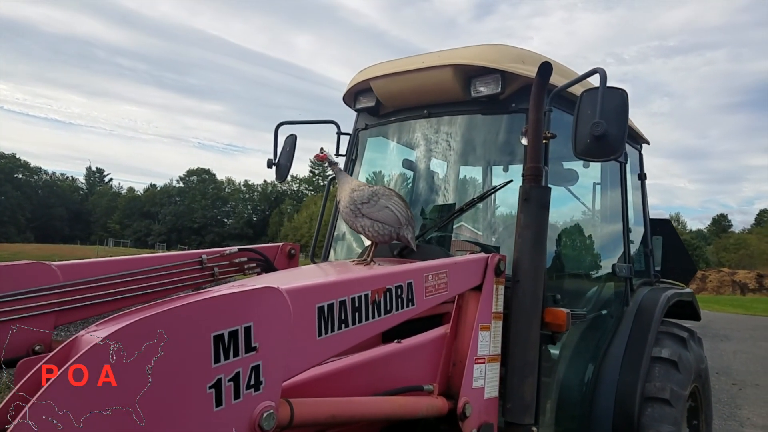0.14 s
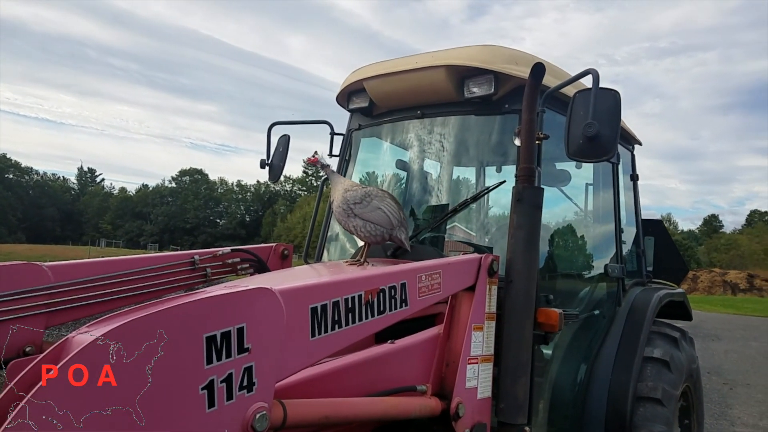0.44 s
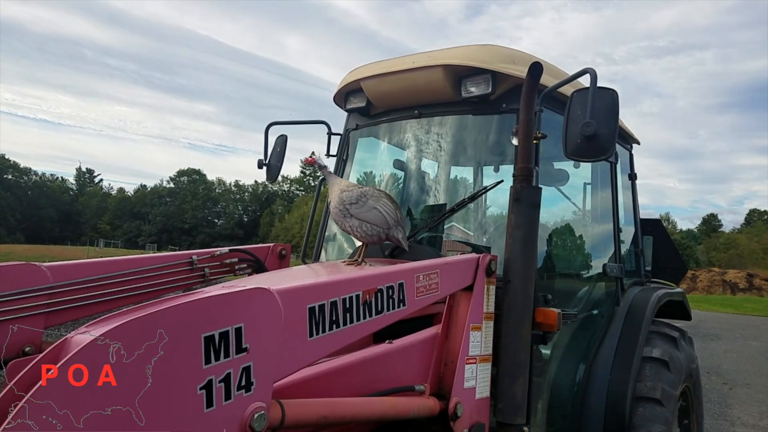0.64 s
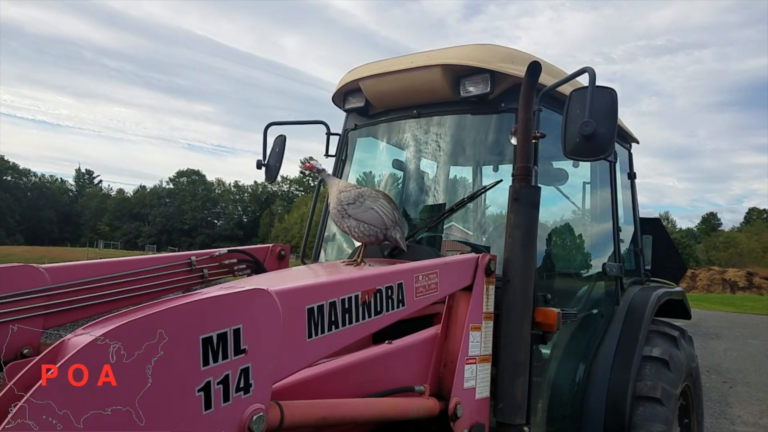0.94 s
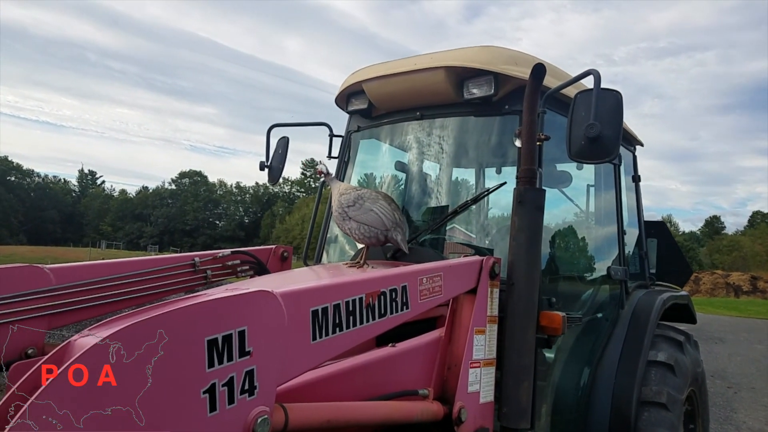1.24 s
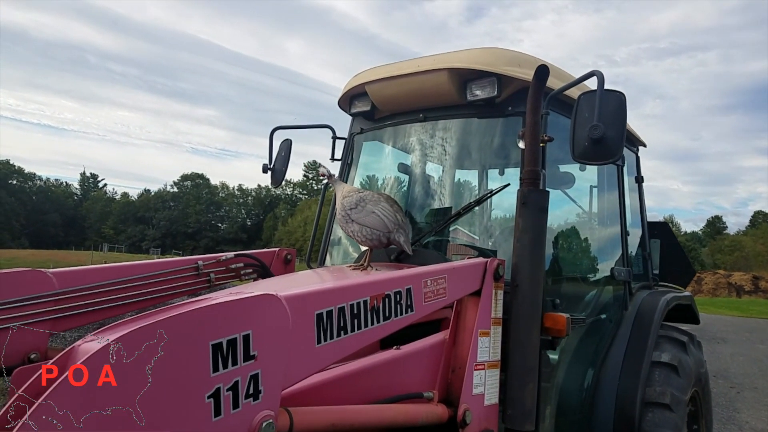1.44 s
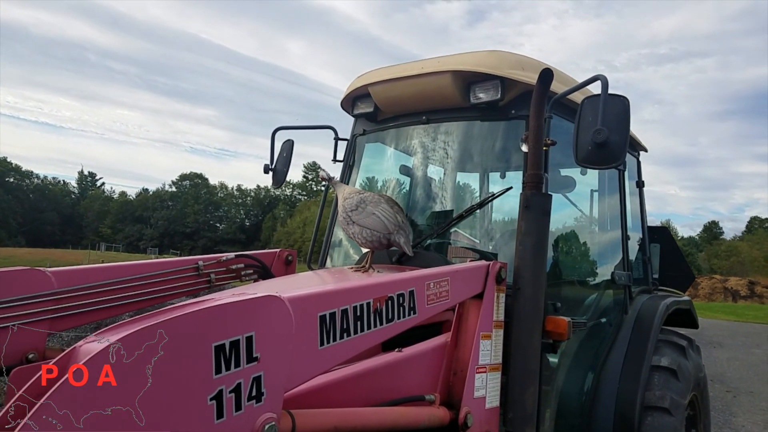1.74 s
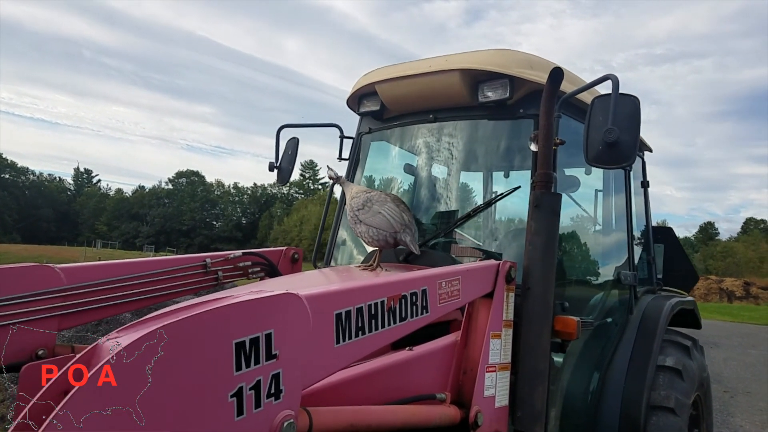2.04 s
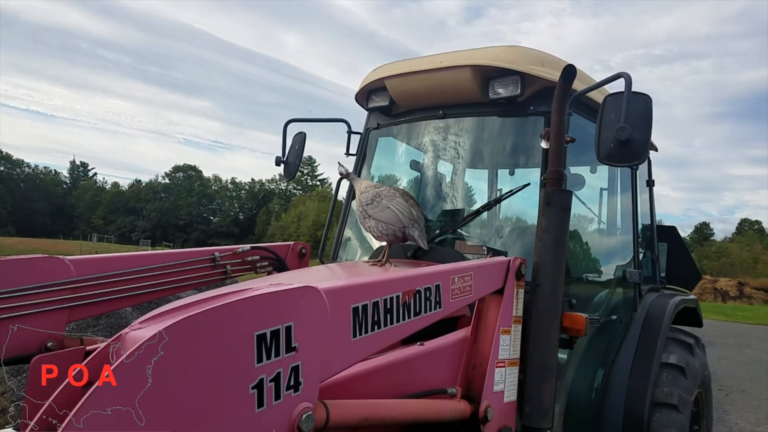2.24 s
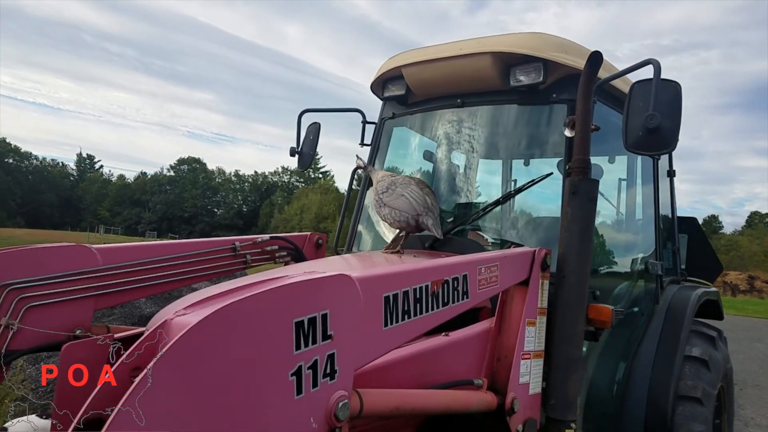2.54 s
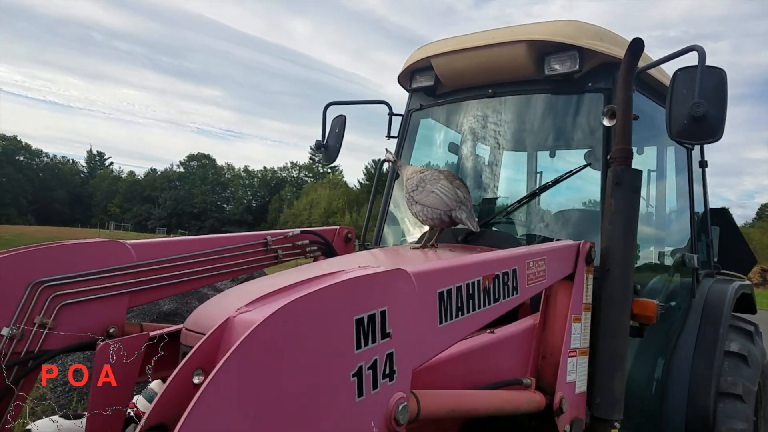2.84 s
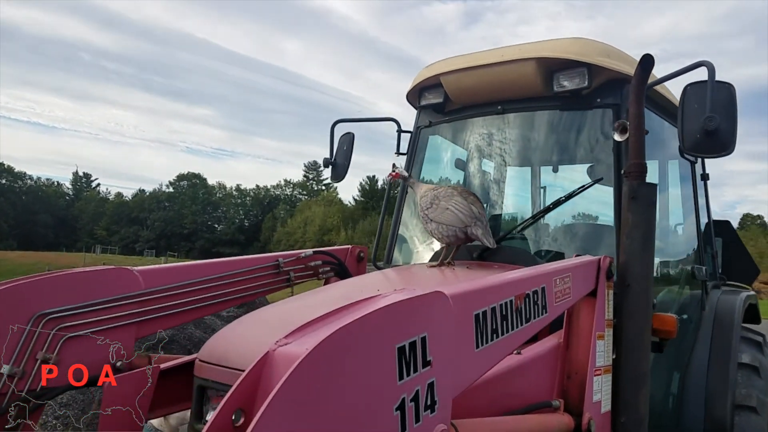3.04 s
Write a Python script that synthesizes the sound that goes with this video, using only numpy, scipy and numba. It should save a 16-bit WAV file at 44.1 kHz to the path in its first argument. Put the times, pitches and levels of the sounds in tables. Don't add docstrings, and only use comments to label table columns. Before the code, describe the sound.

Guineafowl squawking in brief rough bursts outdoors, with soft wind buffeting and a faint distant hum.

```python
import sys
import numpy as np
from scipy import signal
from scipy.fft import rfft, irfft, next_fast_len
from scipy.io import wavfile
from scipy.ndimage import uniform_filter1d, map_coordinates
from numba import njit

SR = 44100
rng = np.random.default_rng(int(sys.argv[2]) if len(sys.argv) > 2 else 0)


def voltage_ratio(level):
    return 10 ** (np.asarray(level, float) / 20)


def wrap_up_sound(samples):
    columns = np.atleast_2d(samples).T
    tamed = np.clip(columns, -1, 1)
    steps = np.round(tamed * 32767).astype(np.int16)
    wavfile.write(sys.argv[1], SR, steps)


N = 141120


@njit
def svf(x, hz, width):
    y = np.empty(len(x))
    b, l, g, k, last = 0., 0., 0., 0., 0.
    for i in range(len(x)):
        if hz[i] != last:
            last, g, k = hz[i], np.tan(np.pi * hz[i] / SR), width / hz[i]
        v = (b + g * (x[i] - l)) / (1 + g * (g + k))
        b, l, y[i] = 2 * v - b, l + 2 * g * v, k * v
    return y


def fixed_svf(x, hz, width):
    return svf(x, np.full(len(x), 1. * hz), 1. * width)


def band(x, hz, width):
    centre = np.clip(hz * np.ones(len(x)), 10, SR * .45)
    return svf(x + 1e-18, centre, 1. * width) * np.sqrt(SR / np.pi / width)


def steep(x, hz, width):
    return svf(band(x, hz, width), hz * np.ones(len(x)), 4.37 * width)


def walk(rate):
    k = int(SR / rate)
    held = np.repeat(rng.standard_normal(N // k + 1), k)
    return 1.3 * uniform_filter1d(uniform_filter1d(held, k), k)[:N]


def burst(t, start_s, db, hz, width, decay_s):
    out = np.zeros(N)
    first = int(start_s * SR)
    n = int(min(3000 + 5 * decay_s * SR, N - start_s * SR))
    fade = np.exp(-np.arange(n) / SR / decay_s)
    x = band(rng.standard_normal(n) * fade, hz, width)
    for _ in range(2):
        x = fixed_svf(x, hz, 1.3 * width)
    out[first:first + n] = voltage_ratio(db) * x
    return out


# start_s, length_s, level_db, syrinx_hz, roughness (0-1)
SQUAWKS = [
    (-.03, .07, -13.5, 701.9, 0.41),
    (0.296, .076, -12.5, 754.7, 0.46),
    (0.72, 0.067, -11, 767.4, .45),
    (1.735, 0.052, -12, 741, 0.11),
    (2.032, 0.069, -13, 746.7, 0.35),
    (2.358, .07, -11.5, 772.8, .4),
    (2.653, .074, -12.5, 761.6, .5),
    (2.994, 0.058, -9.5, 746.2, 0.43),
]
LEADS_S = [.007, .006, .006, .014, .012, .005, .008, .010]


def breath(t):
    calls = np.array(SQUAWKS)
    now = np.clip(np.searchsorted(calls[:, 0] - .03, t) - 1, 0, None)
    start, length, db, _, _ = calls[now].T
    done = (t - start) / length
    left = start + length - t
    swell_db = -7 * np.clip(1 - 3 * done, 0, 1)
    fade_db = -9 * np.clip(2 * done - 1, 0, 1) ** 2
    lead = voltage_ratio(-20) * np.exp(np.minimum(t - start, 0) / np.array(LEADS_S)[now])
    attack_s, release_s = 0.0045, .005
    effort = voltage_ratio(db + swell_db + fade_db) * np.clip((t - start) / attack_s, lead, 1)
    effort = effort * np.exp(np.minimum(left, 0) / release_s)
    sag = 1 - .05 * np.exp(-np.maximum(left, 0) / .02)
    return now, effort, sag


@njit
def slaps(hz, rough, stretch, size):
    out, phase, k = np.zeros(len(hz) + 1), 0., 0
    for i in range(len(hz)):
        step = hz[i] * np.exp(rough[i] * stretch[k]) / SR
        phase += step
        if phase >= 1:
            phase, k = phase - 1, k + 1
            s = np.exp(rough[i] * size[k])
            out[i] += s * phase / step
            out[i + 1] += s * (1 - phase / step)
    return out[:-1]


def syrinx(now, effort, sag):
    hz, rough = np.array(SQUAWKS)[now, 3:].T
    chance = rng.standard_normal((N // 10, 2)).T
    pulses = slaps(hz * sag, rough, .8 * chance[0], 1.15 * chance[1])
    pulses = np.diff(pulses, prepend=0)
    pulses = 0.15 * pulses / np.sqrt(uniform_filter1d(pulses ** 2, 300) + 1e-4)
    drive = effort * fixed_svf(pulses, 2500, 6300) * 3
    puff = effort * rng.standard_normal(N) * (0.91 + 8 * uniform_filter1d(np.abs(pulses), 24))
    return drive, puff


# mode_hz, width_hz, level_db
PIPE = [(672.6, 30, -12), (1017, 90, -9.5), (1178, 27, -6.5), (1520.6, 55, 2), (1886, 62, 0.5),
        (2188, 230, 4.5), (2556, 110, 1.5), (2810, 160, 1), (3080, 150, 2), (3390, 160, 0),
        (3699, 110, 3.5), (4328, 54, 2), (4880, 220, 1.5), (5350, 270, -5.5)]


def windpipe(drive, stretch, sag, beak_hz):
    out = 0
    for k, (hz, width, db) in enumerate(PIPE):
        beak_db = 4 * np.exp(-((hz - beak_hz) / 1510) ** 2)
        level = (-1) ** k * voltage_ratio(db + beak_db + 2.5 * walk(70))
        moving_hz = hz * stretch * sag * (1 + 0.011 * walk(60))
        out = out + level * band(drive, moving_hz, width) * 2000 / hz
    return out


def chest(effort, stretch, chest_db):
    hz = 356 * stretch * (1 + 0.021 * walk(50))
    tone = np.sin(2 * np.pi * np.cumsum(hz) / SR)
    return voltage_ratio(-24.5 + chest_db + 4.0 * walk(60)) * uniform_filter1d(effort, 400) * tone


# centre_hz, width_hz, level_db
RASP = [(800, 1300, -30.5), (5800, 1300, -17.5), (6760, 600, -21.5), (7880, 700, -22), (8810, 900, -19.5),
        (11500, 1700, -20), (13000, 1800, -21)]
# above_7khz_db, above_10khz_db
SHEEN = [(-7, -2), (0, 0), (0, -1), (0, -5), (-1, -6), (-2, -2), (-1, -4), (2, 0)]


def air_rasp(t, now, puff, stretch, rasp_db):
    start = np.array(SQUAWKS)[now, 0]
    rise_s = 0.014
    puff = puff * np.where(t < start, 2.5, np.clip((t - start) / rise_s, .4, 1))
    mid_db, top_db = np.array(SHEEN)[now].T
    out = 0
    for hz, width, db in RASP:
        sheen_db = top_db if hz > 1e4 else mid_db * (hz > 7e3)
        level = voltage_ratio(db + rasp_db + sheen_db + 3.5 * walk(45))
        out = out + level * steep(puff, hz * stretch * (1 + .03 * walk(15)), width)
    return out


# windpipe_stretch (ratio), chest_db, beak_hz, left_right_db, rasp_db
POSTURE = [(.95, -6.5, 3000, -3, -2), (1., 0, 3500, -1.5, 2), (1.01, -3.5, 3305, -1.5, -1.5),
           (.98, -12.5, 3600, -0.5, 0.5), (.99, -13, 2398, -0.5, 0), (0.999, -13.5, 3400, -.5, -2),
           (1., -15.5, 2900, -.5, -3), (1., -7, 4300, -1, 2)]


def bird(t):
    now, effort, sag = breath(t)
    stretch, chest_db, beak_hz, pan_db, rasp_db = np.array(POSTURE)[now].T
    drive, puff = syrinx(now, effort, sag)
    out = windpipe(drive, stretch, sag, beak_hz) + chest(effort, stretch, chest_db)
    out = out + voltage_ratio(-7.5) * steep(drive, 2000, 2200)
    return out + air_rasp(t, now, puff, stretch, rasp_db), pan_db


# start_s, length_s, start_hz, end_hz, level_db
LOCKS = [(-.01, .028, 3570, 3540, -15), (.027, .013, 3570, 3550, -18), (-.01, .05, 1480, 1300, -25),
         (.011, .034, 3000, 3130, -20), (.008, .016, 2050, 2080, -20), (.014, .028, 2480, 2420, -22),
         (.005, .03, 1770, 1720, -26), (.298, .068, 1550, 1400, -24), (.322, .046, 2100, 2230, -16),
         (.296, .032, 3080, 3150, -20), (.318, .015, 3680, 3700, -17), (.338, .014, 3680, 3760, -17),
         (.312, .055, 4300, 4150, -23), (.724, .018, 3130, 3030, -16), (.746, .02, 3750, 3700, -16),
         (.732, .045, 4280, 4220, -25), (.778, .02, 3000, 2900, -20), (1.736, .046, 1490, 1430, -20),
         (1.758, .016, 2240, 2200, -16), (1.74, .018, 2400, 2350, -22), (1.738, .048, 3000, 2960, -24),
         (1.741, .035, 4150, 4050, -26), (2.037, .052, 1520, 1440, -24), (2.04, .068, 2330, 2430, -19),
         (2.068, .02, 3480, 3600, -22), (2.36, .018, 1560, 1540, -18), (2.376, .03, 3560, 3680, -17),
         (2.367, .024, 2450, 2600, -22), (2.372, .028, 1850, 1920, -23), (2.365, .045, 4650, 4250, -26),
         (2.655, .06, 1850, 1930, -23), (2.66, .045, 2580, 2600, -20), (2.67, .052, 3700, 3600, -20),
         (2.722, .015, 1400, 1350, -33), (3.01, .04, 3780, 3680, -14), (2.998, .036, 4350, 4150, -16),
         (2.998, .065, 1530, 1460, -26), (3.018, .022, 1950, 1900, -18), (3.024, .028, 2250, 2330, -20),
         (2.998, .02, 2450, 2350, -24)]
OVERTONES_DB = [-25, -24]


def whistles(t):
    out, edge_s = np.zeros(N), 0.004
    drift = np.array([walk(90), walk(120)])
    for k, (start, length, hz, end_hz, db) in enumerate(LOCKS):
        a = slice(max(int((start - .02) * SR), 0), int((start + length + .03) * SR))
        fade_in = 1 / (1 + np.exp((start - t[a]) / edge_s * 2.5))
        fade_out = 1 / (1 + np.exp((t[a] - start - length) / edge_s))
        wobble, flutter = np.roll(drift, 3001 * k, axis=1)[:, a]
        glide_hz = np.interp(t[a], [start, start + length], [hz, end_hz])
        turn = 2 * np.pi * np.cumsum(glide_hz * (1 + .008 * wobble)) / SR
        tone = np.sin(turn)
        for harmonic, overtone_db in enumerate(OVERTONES_DB, 2):
            if hz * harmonic < SR / 3:
                tone = tone + voltage_ratio(overtone_db) * np.sin(harmonic * turn)
        out[a] += fade_in * fade_out * voltage_ratio(db + 2.5 * flutter) * tone
    return out


# at_hz, left_lead_rad, left_right_db
PORTS = [(300, .4, 1.5), (1400, 0.72, -.5), (2600, 1.1, -1), (4910, 1.6, 0.5), (8530, 1.92, 2.5),
         (16300, 1.6, 2)]


def ports(x):
    n, table = next_fast_len(N + 4096), np.array(PORTS)
    f = np.arange(n // 2 + 1) * SR / n
    turn = np.interp(f, table[:, 0], table[:, 1])
    db = np.interp(f, table[:, 0], table[:, 2])
    turn = turn + 0.46 * np.sin(f / 70) * np.clip(f / 3000, 0, 1)
    half = voltage_ratio(db / 2) * np.exp(.5j * turn)
    return irfft(rfft(x, n) * np.array([half, 1 / half]), n)[:, :N]


def cab(x):
    t = np.arange(1500) / SR
    echo = np.diff(rng.standard_normal((2, len(t) + 1))) * np.exp(-t / .005) * (t > .001)
    return voltage_ratio(-8) * signal.fftconvolve(x[None], echo / np.sqrt(np.sum(echo ** 2) / 2), axes=1)


# centre_hz, level_db, t60_s
YARD = [(1300, -35, 0.21), (2600, -26, 0.36), (4493, -28, 0.31), (7195, -20.5, 0.26), (12600, -24, 0.27)]


def yard(x):
    n = int(.7 * SR)
    t, tail = np.arange(n) / SR, 0
    rise = np.clip(t / 0.004, 0, 1) ** 2
    trees = np.exp(-((t - .36) / .05) ** 2)
    for hz, db, t60 in YARD:
        mid, side = (band(rng.standard_normal(n), hz, hz * .7) for _ in range(2))
        late = voltage_ratio(-43 - 5 * np.log2(hz / 2400) ** 2) * trees
        envelope = voltage_ratio(db) * (rise * voltage_ratio(-60 * t / t60) + late)
        tail = tail + envelope * (mid + side * np.array([[1], [-1]]))
    return signal.fftconvolve(x[None], tail / 30, axes=1)


def each_squawk(x, space):
    out = np.zeros((2, N + SR))
    for start, length, *_ in SQUAWKS:
        a, b = max(int((start - .05) * SR), 0), int((start + length + .08) * SR)
        wet = space(x[a:b])
        out[:, a:a + wet.shape[1]] += wet
    return out[:, :N]


# at_s, gust_db
GUST = [(0, -59), (.1, -52.5), (.3, -56.5), (.4, -44.5), (.68, -47.5), (.86, -45.5), (1.0, -52),
        (1.24, -51.5), (1.4, -55), (1.6, -51.5), (1.9, -50.5), (2.3, -54), (2.55, -64), (2.8, -53),
        (3.2, -70.5)]
# centre_hz, width_hz, level_db
BUFFET = [(40, 75, -3), (90, 70, -1), (170, 190, -6), (310, 83, -18)]
# at_s, level_db, pitch_hz
THUMPS = [(0.517, -33.5, 200), (.61, -41.5, 170), (0.656, -34, 210), (.667, -36.5, 80), (0.884, -33.5, 110),
          (1.10, -40.5, 100.1), (1.205, -39.5, 100), (1.60, -35.5, 90), (1.41, -42, 190), (1.47, -45, 110),
          (1.225, -42, 130), (.84, -40, 60), (.37, -40, 80), (2.35, -46, 70)]


def wind(t):
    gust_db = np.interp(t, *np.array(GUST).T) - 1
    share = rng.uniform(.5, 1.5, (len(THUMPS), 2))
    both_db, out = 1.5 * walk(14), []
    for side in range(2):
        lumps = voltage_ratio(gust_db + both_db + 4.5 * walk(45.13)) * rng.standard_normal(N)
        x = np.zeros(N)
        for hz, width, db in BUFFET:
            x += voltage_ratio(db) * fixed_svf(band(lumps, hz, width), hz, 1.97 * width)
        for (at, db, hz), k in zip(THUMPS, share[:, side]):
            a = slice(int((at - .03) * SR), int((at + .03) * SR))
            cycles = (t[a] - at) * hz
            x[a] += k * voltage_ratio(db) * np.exp(-(cycles / 0.85) ** 2 * 2) * np.cos(2 * np.pi * cycles + side)
        out.append(x)
    return np.array(out) * voltage_ratio(np.array([[-.7], [.7]]))


# at_hz, level_db (per Hz)
HUM = [(88, -31), (150, -13), (334, -12.5), (566, -2), (2500, -38), (2700, -30.5), (10200, -48),
       (13700, -44), (16000, -54.5)]


def hum():
    out, swell_db = 0, walk(0.98)
    f, db = np.array(HUM).T
    for hz in 200 * 2 ** np.arange(0, 6, .67):
        mid, side = (fixed_svf(band(rng.standard_normal(N), hz, hz * 0.99), hz, hz * 0.83) for _ in range(2))
        level_db = np.interp(np.log(hz), np.log(f), db) + 10 * np.log10(hz / 1000)
        level_db = level_db + swell_db + 1.2 * walk(24)
        apart = min(.25 + hz / 5000, 1)
        out = out + voltage_ratio(-50 + level_db) * (mid + apart * side * np.array([[1], [-1]]))
    return out


# start_s, level_db, pitch_hz, partner_db
CLICKS = [
    (.282, -34, 3400, -8),
    (.709, -42, 3800, -8),
    (1.711, -38, 3800, -5),
    (2.012, -42, 3450, -1),
    (2.347, -36, 3600, -3),
    (2.634, -37, 3600, -12),
    (2.977, -44, 3750, -4),
]


def beak_clicks(t):
    out = np.zeros(N)
    for start, db, hz, partner_db in CLICKS:
        out += burst(t, start, db, hz, 600, .006)
        out += burst(t, start + .002, db + partner_db, hz + 800, 600, .006)
    return out


# start_s, level_db, pitch_hz, width_hz, decay_s
HOLLOW = [
    (.42, -58, 1500, 60, .15),
    (2.79, -54, 1390, 70, .1),
    (.55, -72, 7400, 700, .12),
    (1.36, -72, 6600, 1200, .15),
]
# start_s, level_db, pitch_hz, width_hz, decay_s
TICKS = [
    (1.26, -60, 11500, 3930, .004),
    (2.550, -57, 13000, 3938, 0.0011),
    (2.592, -47.5, 10030, 9200, 0.0099),
]


def small_sounds(t):
    return sum(burst(t, *row) for row in [*TICKS, *HOLLOW])


def scene():
    t = np.arange(N) / SR
    rasping, pan_db = bird(t)
    rasping = rasping + beak_clicks(t)
    whistling = whistles(t)
    voice = rasping + whistling
    small = small_sounds(t)
    hiss = voltage_ratio(-75) * np.diff(rng.standard_normal((2, N + 1)))
    stirred = np.interp(t + .0002 * walk(200), t, voice - .6 * whistling)
    near = ports(voice) * voltage_ratio(np.array([pan_db, -pan_db]) / 2)
    sway_s = 2.5e-5 * walk(12)
    near[1] = map_coordinates(near[1], [(t + sway_s) * SR], mode="mirror")
    glass = each_squawk(fixed_svf(voice, 4000, 12000), cab)
    return near + glass + each_squawk(stirred, yard) + small + wind(t) + hum() + hiss


def band_limit(x):
    return signal.sosfilt(signal.butter(12, 16680, fs=SR, output="sos"), x)


def record(dry):
    ceiling = .9
    rounded = ceiling * np.tanh(dry / ceiling)
    top_cut = signal.ellip(8, .2, 70, 16200, fs=SR, output="sos")
    return band_limit(signal.sosfilt(top_cut, rounded))


dry = scene()
out = record(dry)
wrap_up_sound(out)
```